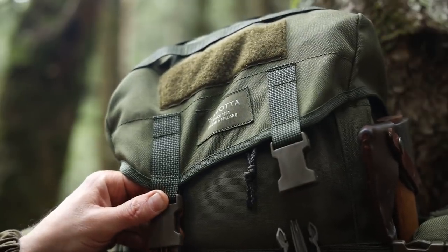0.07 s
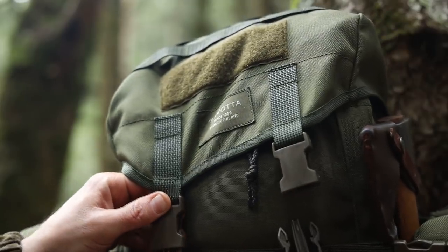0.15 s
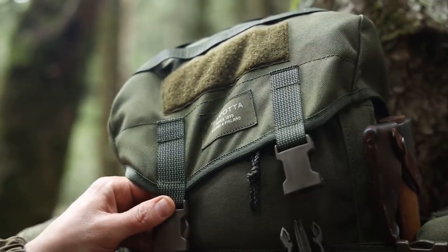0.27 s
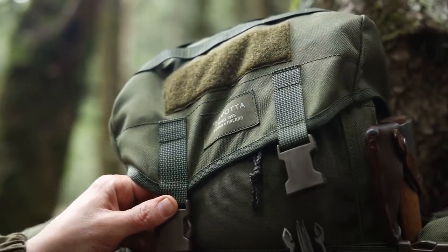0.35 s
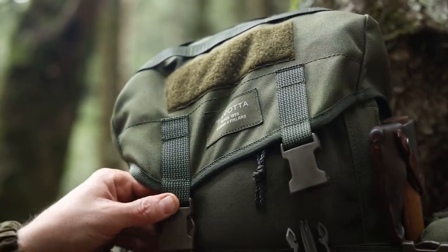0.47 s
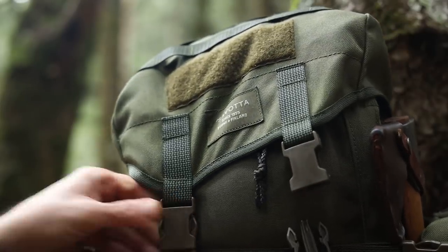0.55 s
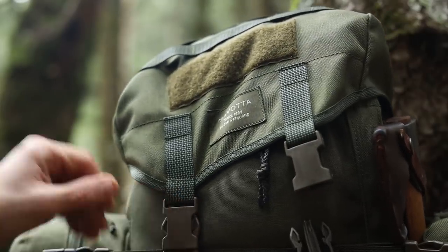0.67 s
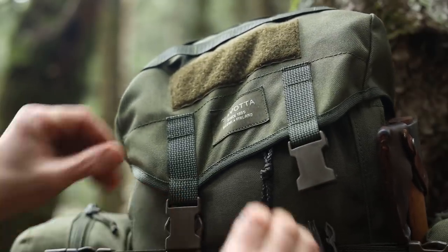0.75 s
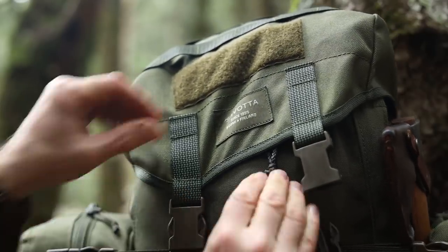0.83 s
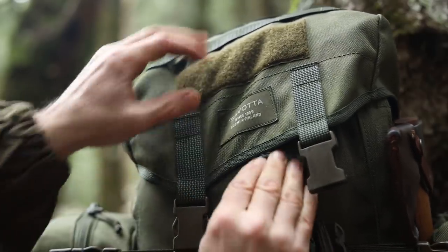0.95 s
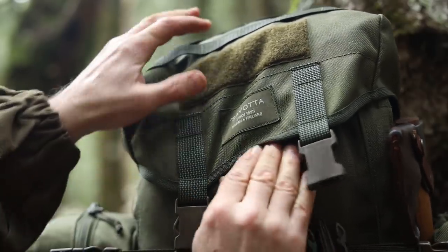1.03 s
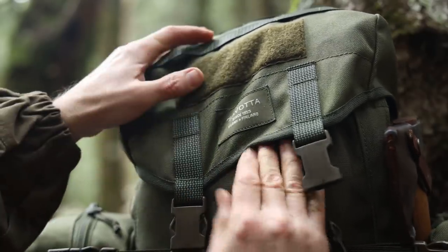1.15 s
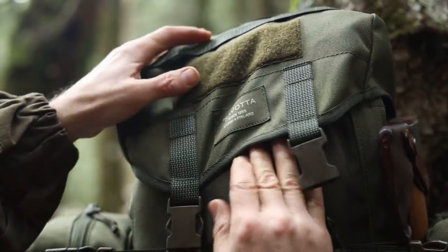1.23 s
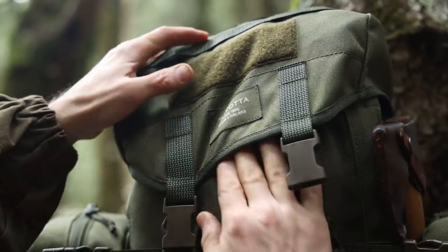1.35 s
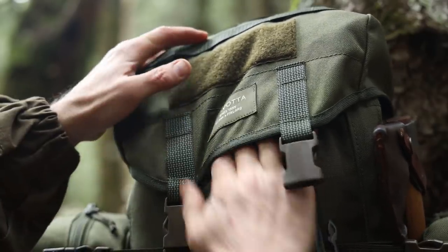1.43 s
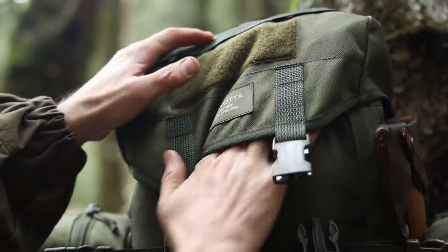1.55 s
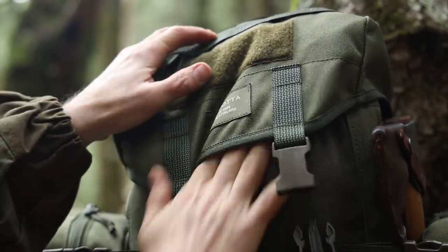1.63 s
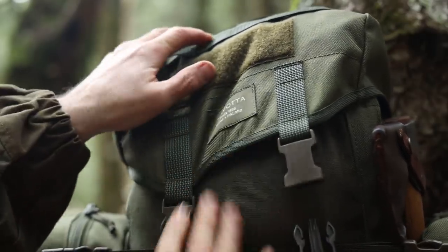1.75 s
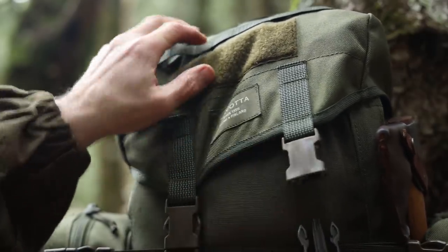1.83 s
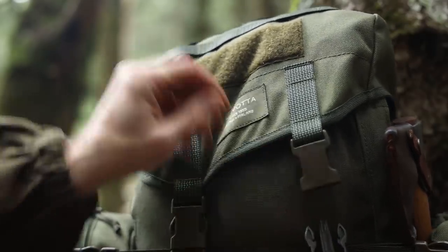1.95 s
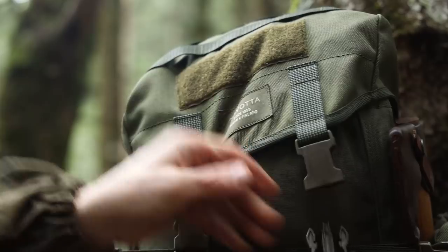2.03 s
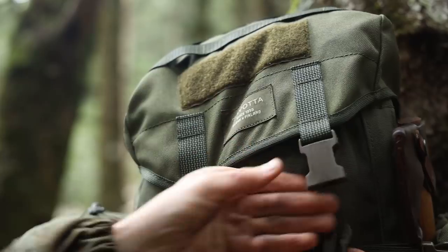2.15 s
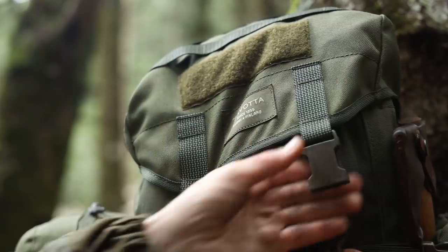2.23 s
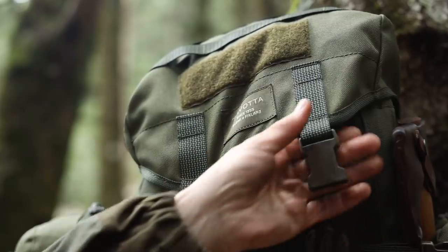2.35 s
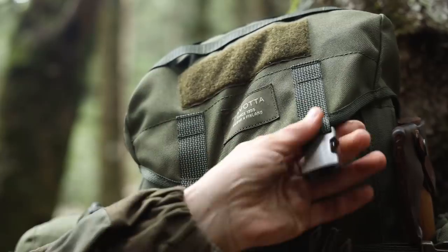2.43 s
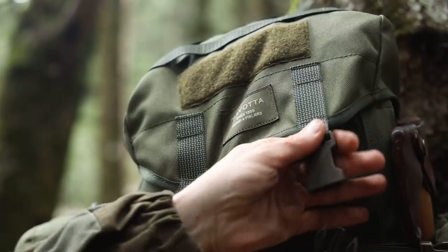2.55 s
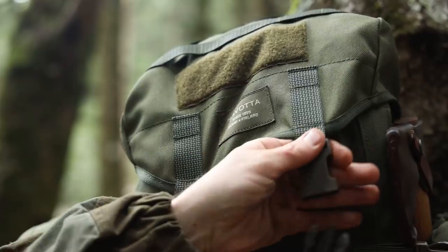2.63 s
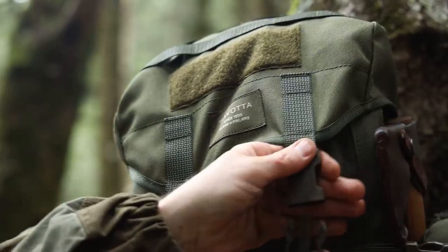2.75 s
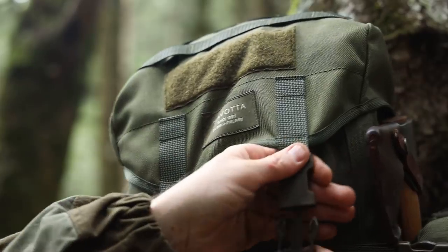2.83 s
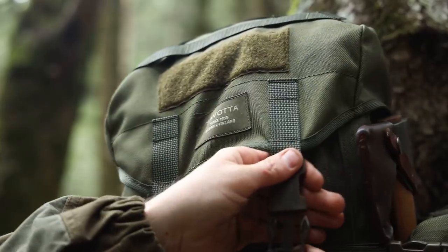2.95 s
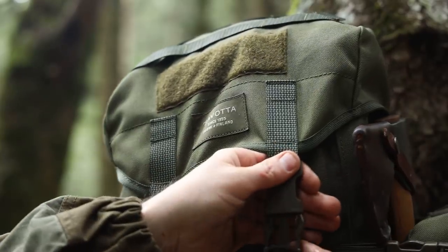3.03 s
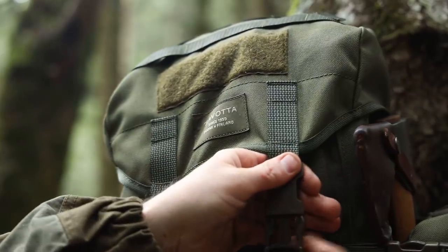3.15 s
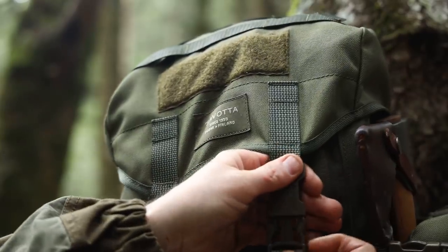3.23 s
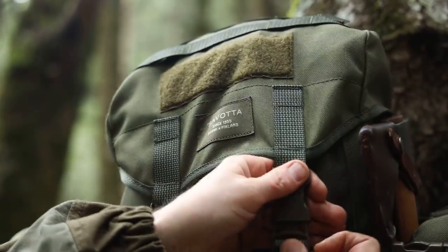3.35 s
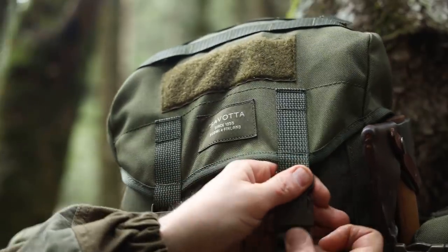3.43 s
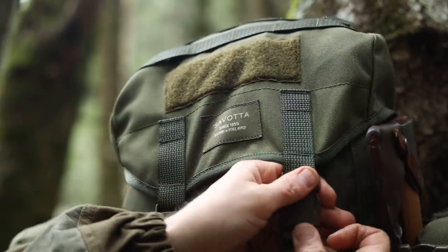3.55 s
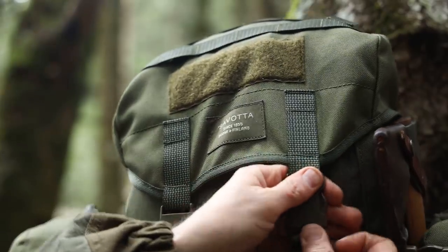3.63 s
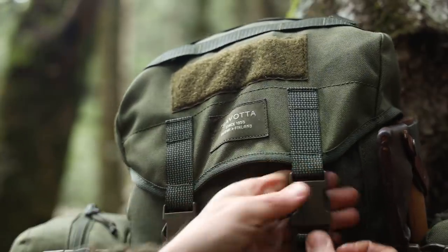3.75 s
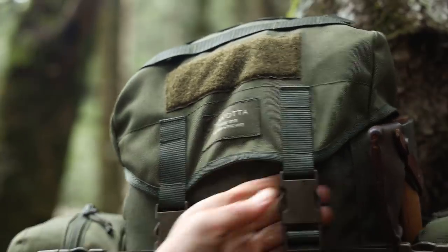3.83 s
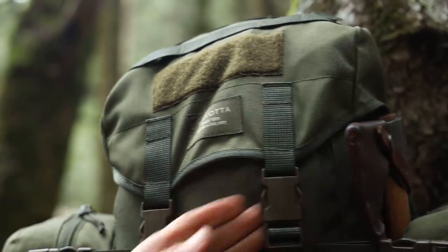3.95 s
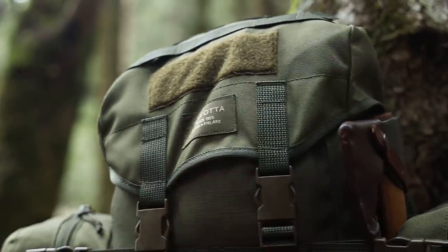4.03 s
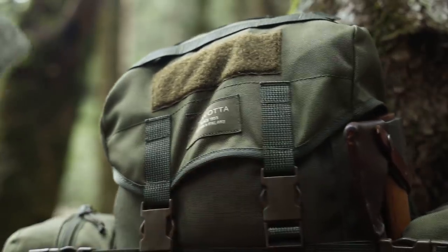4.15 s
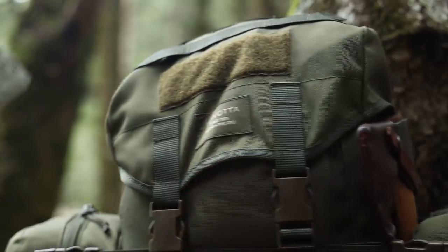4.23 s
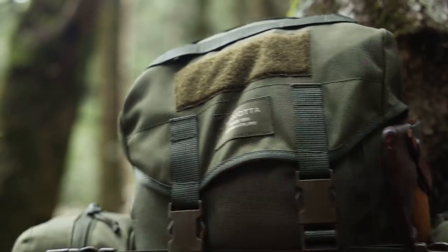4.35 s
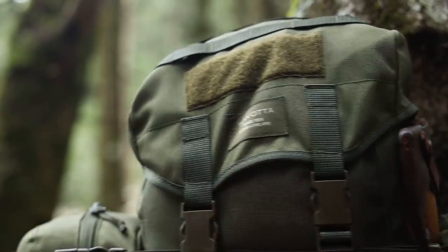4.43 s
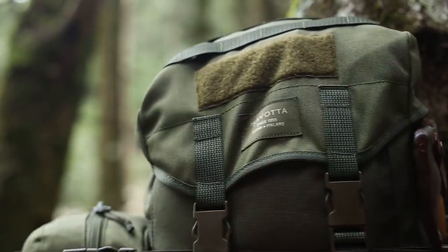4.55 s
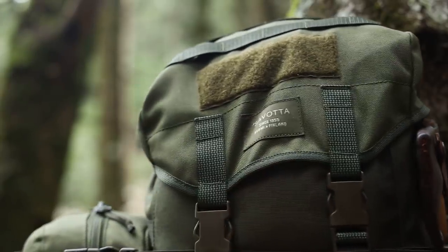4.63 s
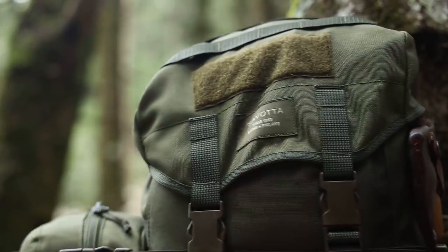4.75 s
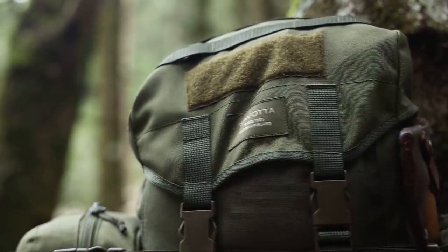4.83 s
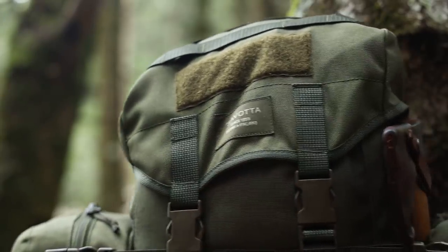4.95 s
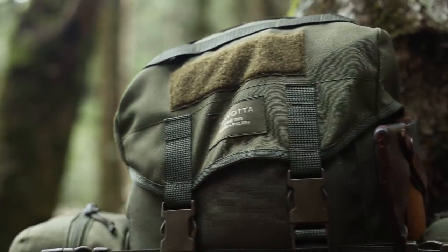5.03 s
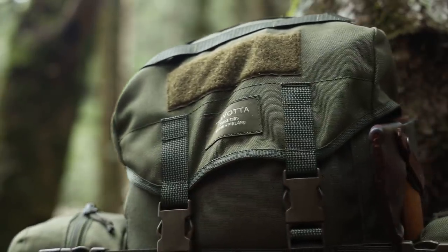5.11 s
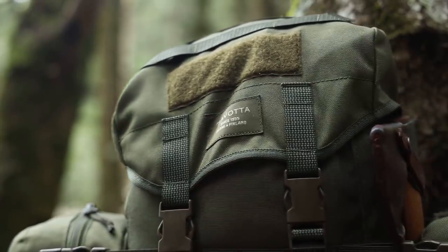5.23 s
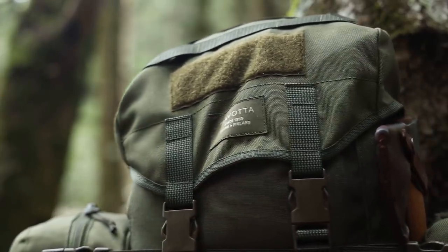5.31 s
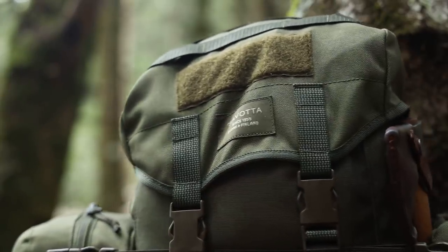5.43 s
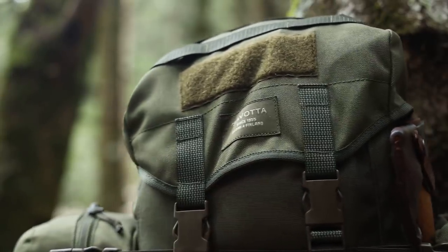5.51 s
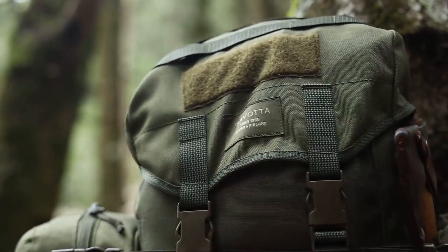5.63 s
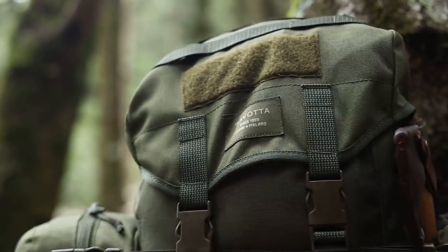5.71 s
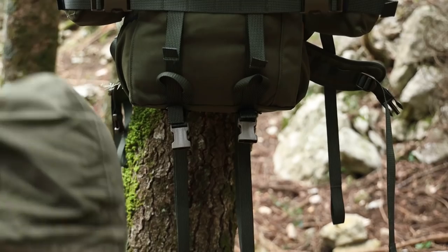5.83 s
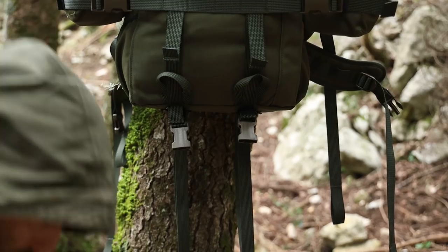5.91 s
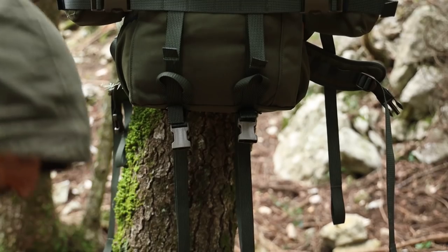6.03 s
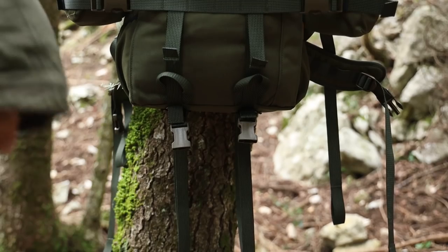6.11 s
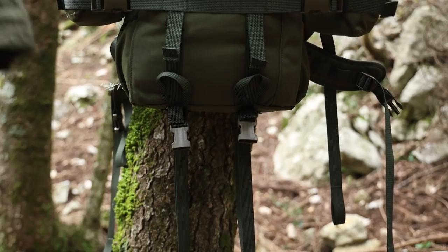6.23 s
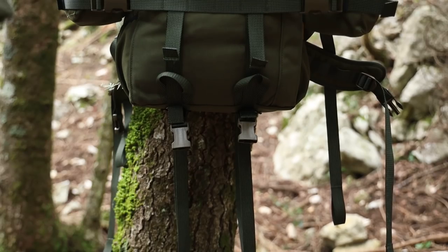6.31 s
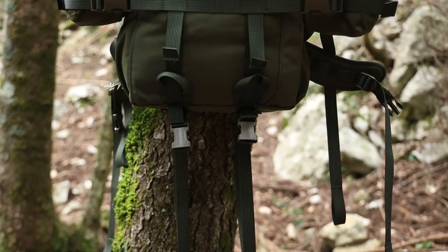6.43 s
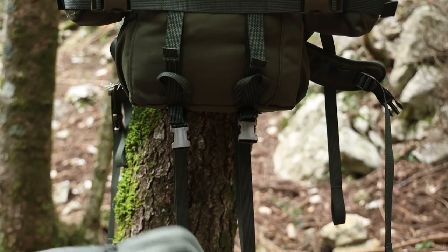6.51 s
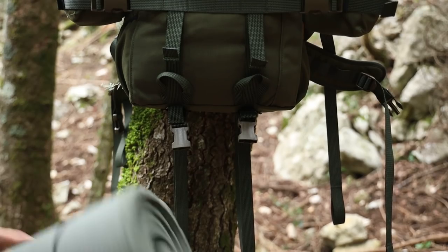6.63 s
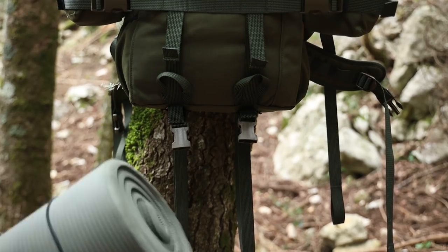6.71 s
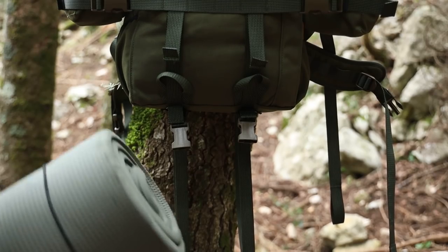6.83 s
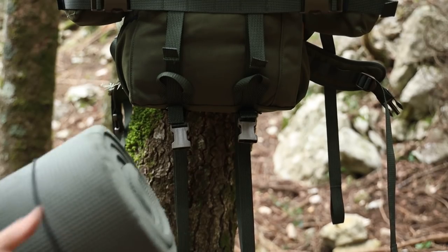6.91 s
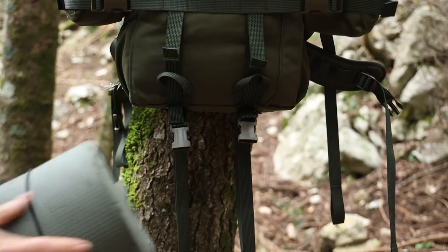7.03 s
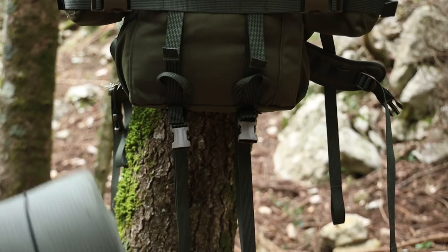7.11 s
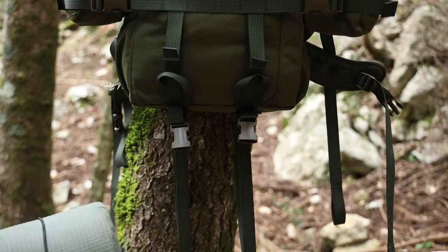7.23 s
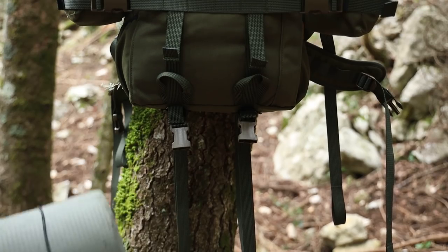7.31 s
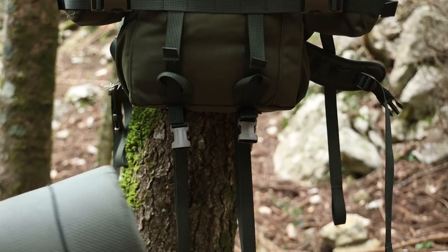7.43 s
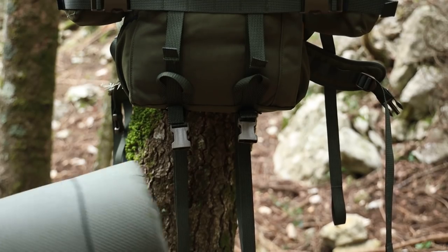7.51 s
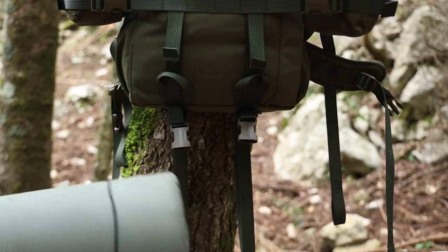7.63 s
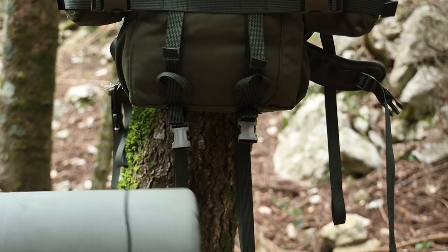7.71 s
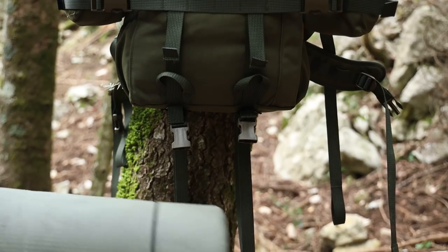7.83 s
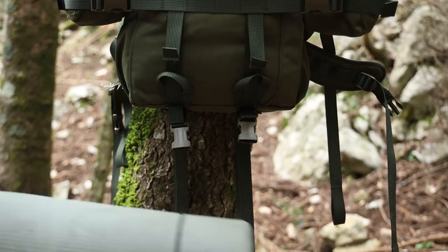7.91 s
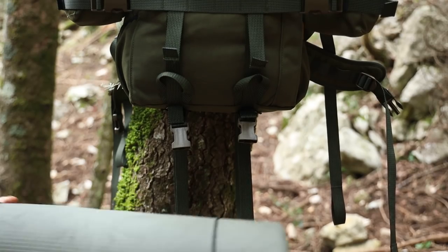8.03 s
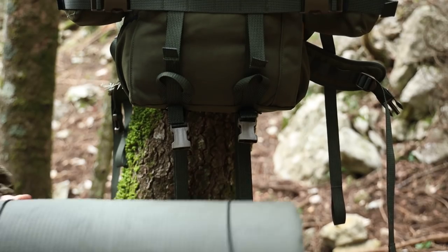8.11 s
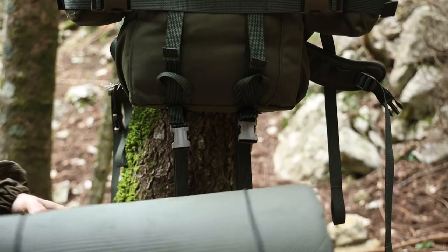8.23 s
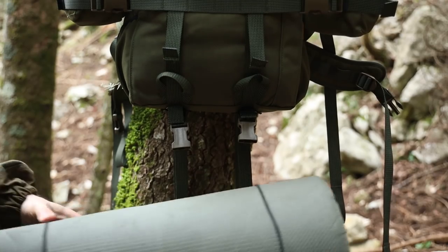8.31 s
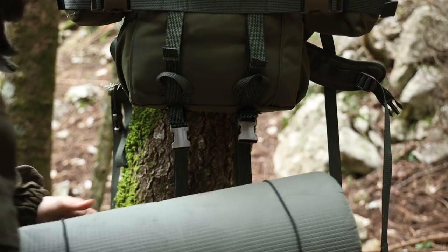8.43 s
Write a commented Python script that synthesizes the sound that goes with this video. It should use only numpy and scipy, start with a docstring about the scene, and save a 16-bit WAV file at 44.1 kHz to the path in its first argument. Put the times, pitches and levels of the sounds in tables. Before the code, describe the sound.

In a quiet forest with a faint wash of wind and leaves, a backpack is handled close to the microphone. One plastic buckle clicks shut, nylon swishes under the hands, and after some small plastic ticks a second, brighter buckle snaps. A few muffled footsteps follow on soft earth. Then a rolled foam mat gives a series of hollow knocks and rubs against a sleeve.

```python
"""Nylon brushes and creases under the hands, and a plastic buckle snaps shut on a pack; later, a second.
Steps thud on soft ground, then a foam roll knocks about and slides along a sleeve, in a quiet forest.
The cloth sounds by stick-slip friction, which drives the resonances of its weave and of the pack.
Buckles and roll ring in damped modes after each impact and echo off the trees; the loudest blows clip."""
import sys
import numpy as np
from scipy import signal
from scipy.io import wavfile
from scipy.ndimage import uniform_filter1d

SR = 44100
rng = np.random.default_rng(int(sys.argv[2]) if len(sys.argv) > 2 else 0)


def master(y):
    """Save y as 16-bit WAV."""
    cut = np.clip(np.atleast_2d(y).T, -1, 1)
    pcm = np.round(cut * 32767)  # scale
    wavfile.write(sys.argv[1], SR, pcm.astype(np.int16))


N = 373086

# spectrum of far leaves and wind: (frequency [Hz], relative density [dB])
AIR_SPECTRUM = [(15, -60), (25, -12), (108, -2.5), (301, 5.5), (560, 2), (1020, -6.5), (2410, -17),
                (5570, -17.5), (8140, -19.5), (14800, -18.5), (16000, -24)]
# echoes off the trees: (frequency [Hz], t60 [s])
TREE_DECAY = [(1500, 0.13), (4000, 0.25), (5800, 0.39), (10500, 0.28), (14000, 0.15)]
# steps on soft ground: (time [s], level [dB], pitch [Hz], t60 [s])
FOOTSTEPS = [(4.37, -46.5, 75.4, .3), (4.729, -48, 107, 0.84), (4.916, -44, 88, 0.9),
             (4.99, -31.5, 95, 0.41), (5.124, -39, 95.5, 0.37), (5.52, -39, 78, 0.68),
             (7.999, -53, 59.3, 1)]
# resonances of the forest floor: (frequency [multiple of the step's pitch], width [Hz], gain [dB])
GROUND_MODES = [(.55, 8.9, -7.5), (1, 30, -11.5)]
# faint rustle of clothing between strokes: (time [s], base level [dB])
RUSTLE_LEVELS = [(0, -53.5), (.7, -52.5), (1.3, -44.5), (1.93, -54.5), (2.5, -69), (3.15, -98), (3.6, -69),
                 (4.8, -51), (5.33, -54), (6.05, -47), (6.6, -60), (7.65, -44.5), (7.99, -53.5),
                 (8.46, -65)]
# offsets from that base level: (creases [dB], boom [dB], hiss [dB], sheen [dB])
RUSTLE_OFFSETS = (-3, -9.5, -6, -14.5)
# strokes of a hand or sleeve on cloth, the last three levels relative to the creases:
# (time at full level [s], rise [s], hold [s], fall [s], creases [dB], boom [dB], hiss [dB], sheen [dB])
CLOTH_STROKES = [(0.101, 0.13, 0.0092, 0.088, -46.5, 11, -7.5, -15),
                 (0.234, 0.059, 0.0046, 0.11, -40.5, 6.5, -7.5, -15),
                 (0.56, 0.13, 0.048, 0.074, -44.5, -3, 0, -16),
                 (0.91, 0.0062, 0.017, 0.32, -40, -19, -3, -17),
                 (1.03, .04, 0.024, 0.12, -39, -7.5, -5, -23),
                 (1.211, 0.03, 0.0049, 0.019, -44, 3, -2, -14),
                 (1.428, 0.054, 0.05, 0.12, -23.5, -8, -6.5, -16),
                 (1.468, 0.048, 0.043, 0.052, -22.5, -8, -15, -18),
                 (1.641, 0.12, 0.085, 0.11, -36, -7.5, 1.5, -25),
                 (1.74, 0.16, 0.032, 0.033, -37, -19, 5, 4), (1.996, 0.033, .01, 0.18, -50.5, 1.5, -6, -12),
                 (2.137, 0.01, 0.089, 0.39, -43, -4, -1.5, -20), (2.27, 0.15, 0.098, 0.16, -44, -25, 4, -4),
                 (2.734, 0.69, 0.082, 1, -49, -24, -4, -11),
                 (3.036, 0.24, 0.022, 0.0073, -52, -0.5, -13, -22),
                 (3.22, 0.0092, 0.014, 0.094, -55.5, 8, 5, 0.5),
                 (3.338, 0.062, .005, 0.052, -42, 3, -5.5, -13),
                 (3.461, 0.11, 0.0093, 0.11, -44.5, 1.5, -6, -16),
                 (3.835, 0.25, .19, 0.013, -37, -7, -3, -12),
                 (4.05, 0.1, 0.083, 0.97, -46.5, -3.5, -12, -18),
                 (4.56, 0.31, 0.13, 0.14, -54, -18, -1, -11), (5.423, 0.073, .02, 0.1, -60, -27, 7.5, -11),
                 (5.788, 0.059, 0.06, 0.1, -52.5, 8.5, 2.5, -19),
                 (6.234, 0.16, 0.078, 0.37, -43, -2.5, -7.5, -24),
                 (6.463, 0.15, 0.011, 0.11, -45.5, -6, -6, -10.5),
                 (6.802, 0.4, 0.0081, 0.48, -44.5, -2.5, -7, -14.5),
                 (7.088, 0.065, 0.17, 0.022, -43, -1, 4.5, 0.5), (7.198, 0.1, 0.11, 0.033, -39.5, 2, -2, 0),
                 (7.425, 0.091, 0.12, 0.038, -51, 1, 4.5, 5),
                 (7.51, 0.12, .01, 0.42, -45.5, -0.5, -15, -18),
                 (8.019, 0.026, 0.0046, 0.12, -45, -2.5, -7, -15),
                 (8.277, 0.38, 0.0092, 0.95, -48, -1, -3.5, -13)]
# resonances of the pack and its cloth: (frequency [Hz], width [Hz], gain [dB])
PANEL_MODES = [(620, 380, 0), (944, 450, 0.5), (1370, 1980, -8)]  # stiff panels
CAVITY_MODES = [(234, 277, 1.7), (418, 300, 0.24)]  # air inside the pack
WEAVE_MODES = [(1940, 3070, 1.5), (4630, 3070, -1), (5570, 1930, 2.5)]  # plucked threads
SHEEN_BANDS = [(6400, 6500, 9.6), (11500, 4200, 1.7), (13700, 1100, 0.5)]  # fine treble of a light, fast stroke
# a strap edge or sleeve rasping in one spot: (start [s], end [s], frequency [Hz], level [dB])
STRAP_RASPS = [(1.391, 1.457, 3000, -31.5), (1.769, 1.798, 6230, -40), (2.314, 2.451, 4200, -45),
               (3.95, 4.024, 3970, -42.5), (5.191, 5.21, 4300, -52), (5.814, 5.853, 5200, -45.5),
               (5.883, 5.96, 5300, -47), (7.106, 7.302, 5100, -39), (7.393, 7.573, 4800, -46.5)]
# a hollow thing dragged on cloth: (start [s], end [s], first pitch [Hz], last pitch [Hz], level [dB])
HOLLOW_SCRAPES = [(1.408, 1.472, 280, 530, -26), (1.471, 1.517, 676, 637, -20),
                  (4.03, 4.355, 880, 820, -48), (7.197, 7.308, 340, 286, -33.5),
                  (7.207, 7.313, 645, 454, -36), (7.418, 7.573, 520, 474, -43)]
# dry ticks of plastic on plastic: (time [s], level [dB], lower mode [Hz])
PLASTIC_TICKS = [(2.133, -29, 3070), (2.4115, -26, 4500), (2.6598, -32.5, 2920), (2.91, -35, 3880),
                 (2.9804, -30, 2810), (3.017, -37, 3300), (3.0377, -31, 3380), (3.0614, -26.5, 4200),
                 (3.064, -25.5, 3400), (5.467, -33, 4020), (5.8185, -26, 4280)]
# fingers, strap ends and loose plastic: (time [s], level [dB], pitch [Hz], relative edge gain [dB])
LIGHT_TAPS = [(0.0337, -29, 684, -21), (0.25, -17, 500, -19), (0.258, -16, 327, -37),
              (0.629, -25.5, 412, -29), (0.9078, -18, 720, -8.5), (1.1976, -19, 740, -6.5),
              (1.2112, -24, 436, -34), (1.407, -13, 736, -11), (1.4478, -9, 870, -5.5),
              (1.4528, -4.5, 925, -38), (1.4713, -10, 900, -9), (1.5659, -12, 535, -10),
              (1.986, -24.5, 560, -23), (1.999, -26, 590, -28), (2.1475, -20, 530, -5),
              (2.805, -30, 860, -17), (3.4705, -25, 312, -4.5), (3.734, -9.5, 340, -14),
              (3.8192, -5.5, 300, -16), (4.0468, -20.5, 374, -22), (4.3632, -22.5, 326, -37),
              (4.661, -25.5, 393, -20), (4.861, -25.5, 1000, -13), (6.077, -24.5, 550, -35),
              (6.2114, -24.5, 1100, -16), (6.3907, -16, 477, -26), (6.4157, -16, 453, -23),
              (6.9238, -22.5, 503, -12.5), (7.0685, -18, 420, -10), (7.0873, -17, 500, -14),
              (7.171, -13.5, 416, -31), (7.275, -16, 322, -35.0), (7.296, -14, 277, -37),
              (8.006, -28, 422, -28), (8.2774, -20, 294, -16)]
# knocks of the foam roll: (time [s], level [dB], contact [s], mode scale [ratio], relative crack [dB])
ROLL_KNOCKS = [(5.9499, -11.5, 0.0008, 1.52, -22), (5.954, -17, 0.00099, 0.69, -18),
               (5.982, -22.5, 0.0064, 1.8, 5), (5.9956, -7, 0.0051, 1.2, 6.5),
               (6.344, -10.5, 0.0095, 2.26, 8), (6.351, -5.5, 0.0054, 0.9, -28),
               (6.757, -5, 0.011, 1.15, -11), (6.7736, -9, 0.0086, 0.95, -6),
               (7.031, -3.5, 0.005, 1.04, -6), (7.0351, -8, 0.0078, 1.12, -2), (7.047, -9, 0.012, 0.94, -4),
               (7.052, -3, 0.006, 0.98, -16)]
# modes of the roll before each knock scales them: (frequency [Hz], gain [dB], t60 [s])
ROLL_MODES = [(219, -6, 0.038), (471, 2.5, 0.012), (614, -1.5, 0.015), (955, -3.5, 0.0071),
              (1550, -11, 0.0068)]
# the left buckle closing, then the right: (time [s], level [dB], chatter [s])
BUCKLE_SNAPS = [(0.2694, -1, 0.0043), (3.4953, -0.5, 0.0029)]
# modes of each buckle with the cloth behind it, one list a buckle: (frequency [Hz], gain [dB])
BUCKLE_MODES = [
    [(300, -4.5), (740, -1.5), (1230, -6.5), (2180, -1), (4150, -4), (4800, 2), (6000, 4.5), (9600, -6),
     (11000, -6), (14000, -16)],
    [(650, -4), (1000, -7), (3150, 10.5), (3560, 13.5), (5000, 4), (5450, 16), (6300, -2), (8200, 1),
     (11500, -7)],
]

AIR_DB = -52.5
RAMP_DB = 20  # a stroke swells and fades by this much over its rise and fall times
CEILING_DROP_S, BAND_LIMIT_HZ = 5.7, 15950


def gain_of(db):
    """Amplitude ratio of a level in decibels."""
    return 10 ** (np.asarray(db) / 20)


def unit_rms(x):
    """Normalisation to unit mean power."""
    return x / np.sqrt(np.mean(x ** 2) + 1e-20)


def curve_at(points, hz):
    """Interpolation on a logarithmic frequency axis."""
    knots_hz, values = np.transpose(points)
    return np.interp(np.log(hz + 1), np.log(knots_hz + 1), values)


def add(mix, start_s, sound):
    """Superposition: a sound joins the mix at its start time."""
    part = mix[round(start_s * SR):][:len(sound)]
    part += sound[:len(part)]


def resonate(x, modes, order=1):
    """Forced resonance: parallel bands sum in alternating polarity; higher orders steepen the skirts."""
    out = np.zeros(len(x))
    for k, (hz, width, db) in enumerate(modes):
        b, a = signal.iirpeak(hz, hz / width, SR)
        band = x
        for _ in range(order):
            band = signal.lfilter(b, a, band)
        out += (-1) ** k * gain_of(db) * band
    return out


def stick_slip(per_s, spread_db, smooth):
    """Stick-slip friction: sparse jerks of uneven size, blended with a share of smooth noise."""
    sizes = gain_of(spread_db * np.minimum(rng.exponential(1, N), 5))
    jerks = sizes * (rng.random(N) < per_s / SR)
    return smooth * rng.standard_normal(N) + (1 - smooth) * unit_rms(jerks * rng.standard_normal(N))


def flutter(depth_db, span_s):
    """Amplitude modulation: a random gain stands for the uneven pressure of the hand."""
    size = round(span_s * SR)
    drift = uniform_filter1d(uniform_filter1d(rng.standard_normal(N), size), size)
    return gain_of(depth_db * unit_rms(drift))


def struck(modes, contact_s, noise, blow, settle_db, settle_s, scale=1):
    """Modal response to a blow, a rattling contact and its faint settling; unit rms in the attack."""
    t = np.arange(len(noise)) / SR
    force = noise * np.where(t < contact_s, 1, gain_of(settle_db - 60 * (t - contact_s) / settle_s))
    force[0] = blow * np.sqrt(contact_s * SR)
    ring = sum(gain_of(db - 60 * t * scale / t60) * np.sin(2 * np.pi * hz * scale * t)
               for hz, db, t60 in modes)
    sound = signal.fftconvolve(force, ring)[:len(t)]
    attack = sound[:round((contact_s + .003) * SR)]
    return sound / np.sqrt(np.mean(attack ** 2))


def thinned_bass(x, cutoff_hz):
    """Second-order high-pass: the near sounds carry little bass below the cut-off."""
    return signal.sosfilt(signal.butter(2, cutoff_hz, "high", fs=SR, output="sos"), x)


def forest_air():
    """Broadband noise of far leaves and wind: a hiss, patchy in the low range and steady at the top."""
    frames, hz = N // 256 + 5, np.fft.rfftfreq(1024, 1 / SR)
    real, imag, patches = rng.standard_normal((frames, 513, 3)).T
    patches = unit_rms(uniform_filter1d(uniform_filter1d(patches, 12, 0), 14, 1))
    level_db = curve_at(AIR_SPECTRUM, hz)[:, None] + 3.7 * patches / (1 + hz[:, None] / 3000)
    hiss = signal.istft((real + 1j * imag) * gain_of(level_db), nperseg=1024, noverlap=768)[1]
    return gain_of(AIR_DB) * unit_rms(hiss[:N])


def tree_echoes(x):
    """Scattering off trunks leaves a diffuse tail, each band decaying at its own rate."""
    hz, t, spectrum = signal.stft(rng.standard_normal(SR // 2), SR, nperseg=256)
    decay = gain_of(-60 * t / curve_at(TREE_DECAY, hz)[:, None])
    tail = signal.istft(spectrum * decay, SR, nperseg=256)[1]
    tail *= np.arange(len(tail)) > .004 * SR  # delay of the first echo
    return signal.fftconvolve(x, tail / np.linalg.norm(tail))[:N]


def footsteps():
    """Damped vibration of the forest floor under a settling weight: a push, then a dying shudder."""
    out, t = np.zeros(N), np.arange(SR // 2) / SR
    for (s, db, hz, t60), noise in zip(FOOTSTEPS, rng.standard_normal((len(FOOTSTEPS), len(t)))):
        modes = [(ratio * hz, width, mode_db) for ratio, width, mode_db in GROUND_MODES]
        shudder = unit_rms(resonate(noise, modes, order=2))
        push = 1.4 * np.sin(2 * np.pi * hz * t) * gain_of(-60 * t / 0.23)
        add(out, s, (shudder + push) * gain_of(db - 60 * t / t60) * np.minimum(t / 0.0033, 1))
    return out


def cloth_envelopes():
    """Incoherent sources add in power: rustle and strokes set the gains of the four cloth layers."""
    t = np.arange(0, N, 32) / SR
    rustle_db = np.interp(t, *np.transpose(RUSTLE_LEVELS))
    power = gain_of(rustle_db + np.array(RUSTLE_OFFSETS)[:, None]) ** 2
    for s, rise_s, hold_s, fall_s, db, *offsets_db in CLOTH_STROKES:
        fade = np.maximum(np.maximum((s - t) / rise_s, (t - s - hold_s) / fall_s), 0)
        power += gain_of(db - RAMP_DB * fade + np.array([0, *offsets_db])[:, None]) ** 2
    return [np.interp(np.arange(N) / SR, t, row) for row in np.sqrt(power)]


def cloth():
    """Frictional excitation: creases ring the panels and the air within; sliding plucks the weave."""
    pressure = flutter(depth_db=0.98, span_s=0.014)
    creasing = stick_slip(per_s=1200, spread_db=3.3, smooth=0.66)
    creasing = creasing * flutter(0.53, 0.0049) * flutter(1.8, 0.032)
    sliding = stick_slip(per_s=2500, spread_db=2.5, smooth=0.79) * flutter(1.2, 0.0055)
    gliding = stick_slip(per_s=4000, spread_db=3, smooth=1)
    creases = resonate(creasing, PANEL_MODES, order=2)
    boom = resonate(creasing, CAVITY_MODES, order=2)
    hiss = resonate(sliding, WEAVE_MODES, order=2)
    sheen = resonate(gliding, SHEEN_BANDS, order=2)
    layers = zip((creases, boom, hiss, sheen), cloth_envelopes())
    return pressure * sum(unit_rms(layer) * gain for layer, gain in layers)


def strap_rasps():
    """Rapid stick-slip drives one broad resonance, swelling and holding until the contact lets go."""
    out, jerks = np.zeros(N), stick_slip(per_s=3000, spread_db=2.4, smooth=0.48)
    for start, end, hz, db in STRAP_RASPS:
        progress = np.linspace(0, 1, round((end - start) * SR))
        force = jerks[round(start * SR):][:len(progress)]
        rasp = unit_rms(resonate(force, [(hz, 0.37 * hz, 0)], order=2))
        envelope = np.minimum(progress / 0.17, 1) * np.minimum((1 - progress) / 0.056, 1)
        add(out, start, gain_of(db) * rasp * envelope)
    return out


def hollow_scrapes():
    """Stick-slip drives a narrow resonance of a hollow body, its note sliding in pitch."""
    out = np.zeros(N)
    jerks = stick_slip(per_s=900, spread_db=1.06, smooth=0.62) * flutter(1.2, 0.022)
    for start, end, first_hz, last_hz, db in HOLLOW_SCRAPES:
        progress = np.linspace(0, 1, round((end - start) * SR))
        force = jerks[round(start * SR):][:len(progress)]
        carrier = np.exp(2j * np.pi * np.cumsum(first_hz + (last_hz - first_hz) * progress) / SR)
        pole = np.exp(-np.pi * .16 * last_hz / SR)  # bandwidth is 16% of the last pitch
        note = carrier * signal.lfilter([1 - pole], [1, -pole], force / carrier)
        envelope = np.sqrt(np.sin(np.pi * progress).clip(0))
        add(out, start, gain_of(db) * unit_rms(note.real) * envelope)
    return out


def plastic_ticks():
    """Free vibration of two stiff, inharmonic modes, damped within milliseconds."""
    out, t = np.zeros(N), np.arange(600) / SR
    for (s, db, hz), side in zip(PLASTIC_TICKS, rng.random(len(PLASTIC_TICKS))):
        ring = np.sin(2 * np.pi * hz * t) + 0.6 * np.sin(2 * np.pi * 1.62 * hz * t)
        add(out, s, np.sign(side - .5) * gain_of(db - 60 * t / 0.0039) * ring)
    return out


def light_taps():
    """Damped oscillation whose pitch sags as the contact softens, with a brief bright edge."""
    out, t = np.zeros(N), np.arange(2500) / SR
    warped_time = t + 0.76 * 0.00077 * (1 - np.exp(-t / 0.0001))
    for (s, db, hz, edge_db), noise in zip(LIGHT_TAPS, rng.standard_normal((len(LIGHT_TAPS), 2500))):
        noise[0] = 4  # first touch
        wobble = np.sin(2 * np.pi * hz * warped_time) * gain_of(-60 * t / 0.012)
        onset = np.minimum(t / 0.00051, 1)
        edge = resonate(noise, [(1460, 500, 15.5), (4970, 3600, -6)]) * gain_of(edge_db - 60 * t / 0.012)
        add(out, s, gain_of(db) * (wobble * onset + edge))
    return out


def foam_roll():
    """Impact excites hollow modes, rounded by the soft foam; the surface cracks during contact."""
    out, t = np.zeros(N), np.arange(5000) / SR
    softness = signal.butter(4, 4000, fs=SR, output="sos")
    noises = rng.standard_normal((len(ROLL_KNOCKS), 2, len(t)))
    for (s, db, contact_s, scale, crack_db), (rattle, cells) in zip(ROLL_KNOCKS, noises):
        grit = unit_rms(cells * abs(cells))  # cells of foam giving way unevenly
        grit *= np.minimum(t / (0.33 * contact_s), 1)
        burst = gain_of(crack_db + 3.5 - 24 * t / contact_s)
        tail = gain_of(crack_db - 22 - 60 * t / 0.094)
        crack = resonate(grit, [(2820, 4600, 0)], order=2) * (burst + tail)
        thud = struck(ROLL_MODES, contact_s, rattle, blow=0.26, settle_db=-19, settle_s=0.089, scale=scale)
        add(out, s, gain_of(db) * (signal.sosfilt(softness, thud) + crack))
    return out


def buckles():
    """Elastic release: prongs spring out and chatter on the housing; plastic damps high modes fastest."""
    out, noises = np.zeros(N), rng.standard_normal((len(BUCKLE_SNAPS), 5000))
    for (s, db, chatter_s), shape, rattle in zip(BUCKLE_SNAPS, BUCKLE_MODES, noises):
        modes = [(hz, mode_db, .23 / np.sqrt(hz)) for hz, mode_db in shape]
        snap = struck(modes, chatter_s, rattle, blow=1.38, settle_db=-13.5, settle_s=0.041)
        add(out, s, gain_of(db) * snap)
    return out


def scene():
    """Superposition of impacts, their echoes, friction, steps and forest air in one channel."""
    snaps, knocks, touches = buckles(), foam_roll(), light_taps() + plastic_ticks()
    echoes = tree_echoes(gain_of(-30.5) * snaps + gain_of(-24.0) * (knocks + touches))
    handling = snaps + knocks + echoes + cloth() + strap_rasps() + hollow_scrapes()
    near = thinned_bass(handling, cutoff_hz=237) + thinned_bass(touches, cutoff_hz=108)
    return (near + footsteps() + forest_air())[None]


def record(dry):
    """Hard clipping flattens peaks at a ceiling that steps down once; filters then limit the band."""
    ceiling = np.where(np.arange(N) / SR < CEILING_DROP_S, .53, .39)
    clipped = np.clip(dry, -ceiling, ceiling)
    bass_cut = signal.lfilter(*signal.butter(1, 45, "high", fs=SR), clipped)
    lowpass = signal.firwin(511, BAND_LIMIT_HZ, window=("kaiser", 9), fs=SR)
    return signal.oaconvolve(bass_cut, lowpass[None], "same")


dry = scene()
out = record(dry)
master(out)
```